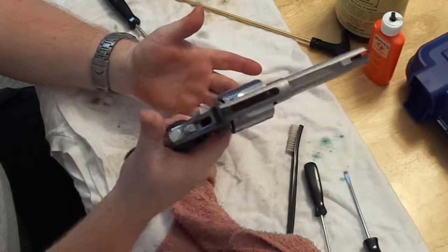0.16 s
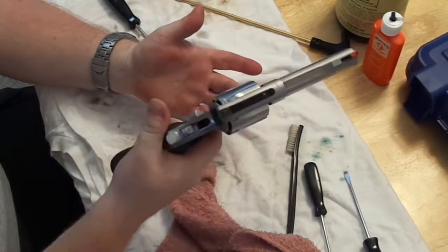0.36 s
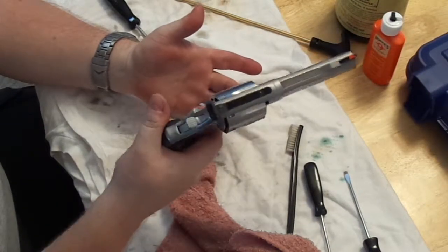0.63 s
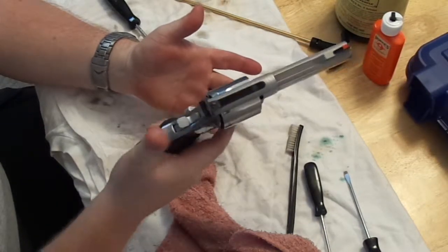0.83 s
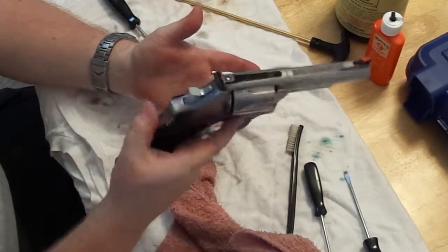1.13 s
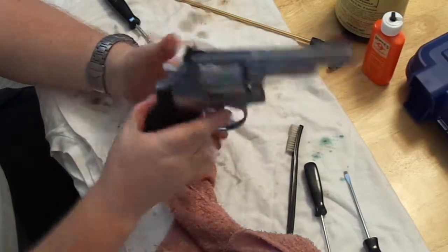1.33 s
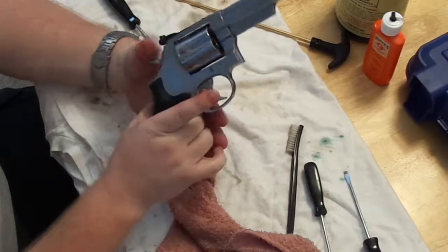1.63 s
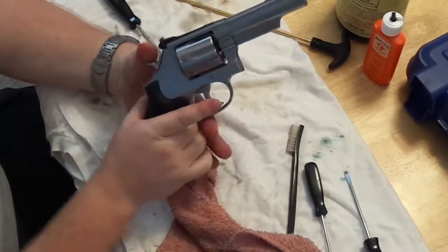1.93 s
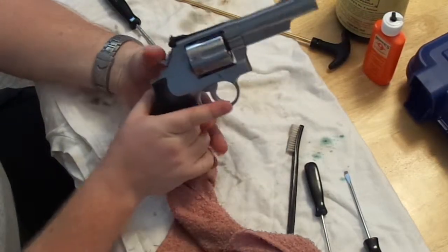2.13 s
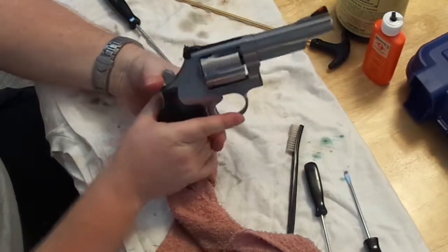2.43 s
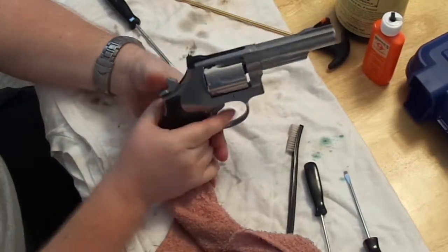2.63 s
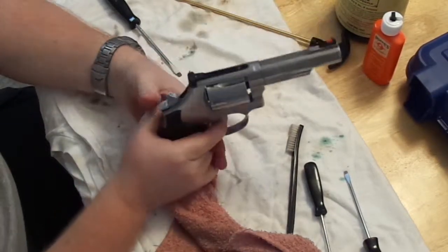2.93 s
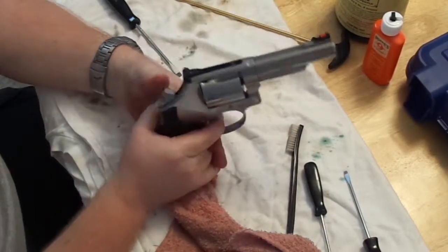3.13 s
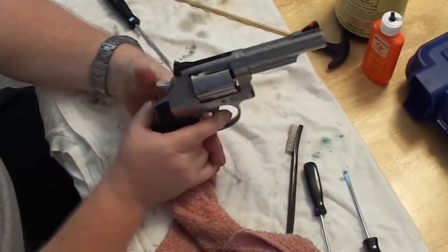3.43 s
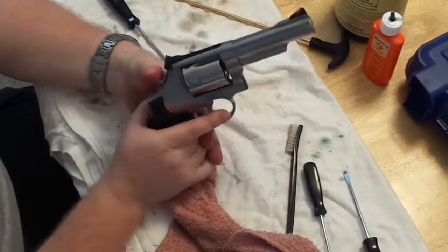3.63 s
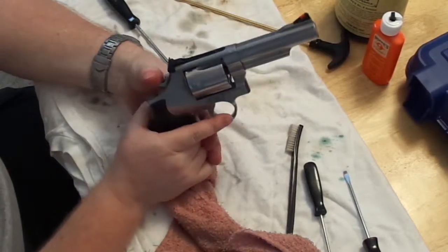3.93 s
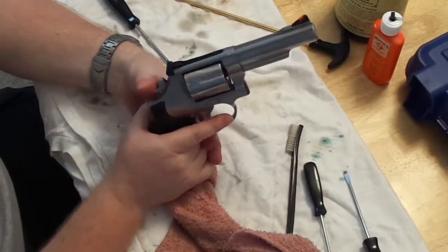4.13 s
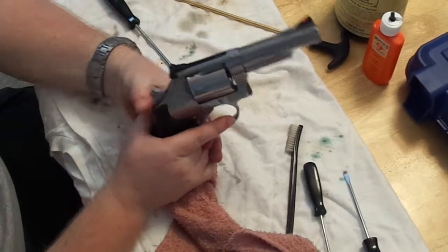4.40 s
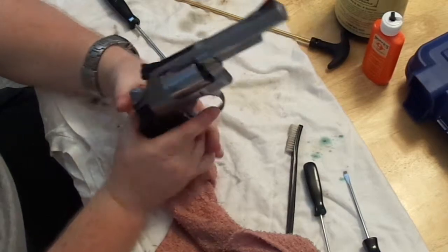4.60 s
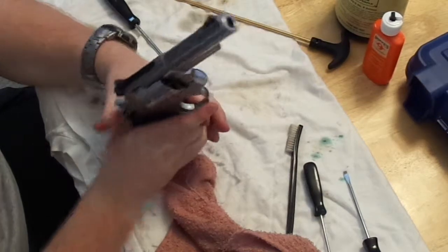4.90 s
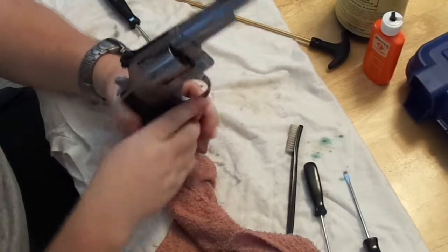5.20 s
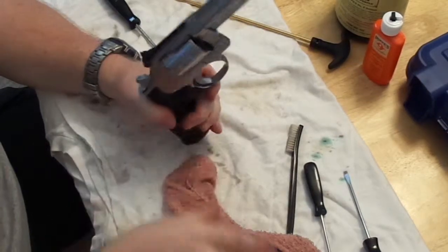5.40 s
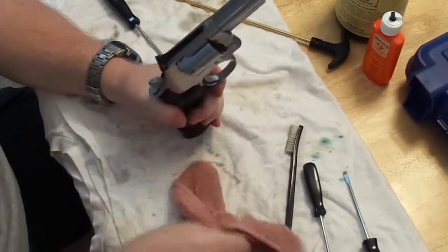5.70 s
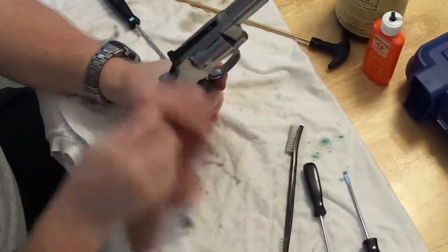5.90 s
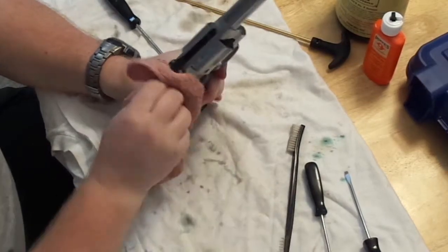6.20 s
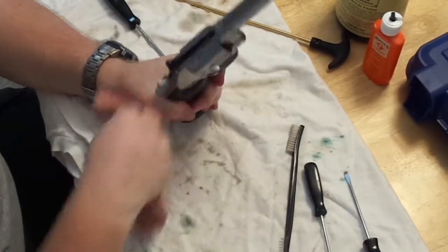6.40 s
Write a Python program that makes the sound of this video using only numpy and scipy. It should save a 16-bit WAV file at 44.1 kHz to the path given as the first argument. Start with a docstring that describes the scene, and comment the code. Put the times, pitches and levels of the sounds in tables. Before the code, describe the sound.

Close handling of a steel revolver over a cloth-covered table in a small room. A bright, overloading hammer snap comes early, then a sharp trigger-return click and a rapid ratcheting cock. A second equally violent snap follows, with another reset and cocking. Finally come faint squeaks, soft cloth bumps and light cylinder ticks. A quiet steady appliance hum and rush lies beneath; nearly mono, with short room reflections.

```python
"""A steel revolver's hammer falls twice with a snap that overloads the microphone, over a table in a small room.
After each fall the trigger resets and the hammer is cocked again; late on, a cloth is brought to the gun and
its cylinder ticks. Contacts are short noise bursts that excite decaying steel modes, then coloured and echoed.
Below them lie dull bumps, faint narrow-band squeaks and an appliance: filtered noise, steady tones, motor drone."""
import sys
import numpy as np
from scipy import signal
from scipy.fft import rfft, irfft, next_fast_len
from scipy.io import wavfile
from scipy.ndimage import minimum_filter1d, map_coordinates

SR = 44100
rng = np.random.default_rng(int(sys.argv[2]) if len(sys.argv) > 2 else 0)


def to_wav(s):
    """Save 16-bit WAV."""
    ch = np.atleast_2d(s).T  # columns
    pcm = np.round(np.clip(ch, -1, 1) * 32767)  # PCM
    wavfile.write(sys.argv[1], SR, pcm.astype(np.int16))


N = 288842


def amp(db):
    """Amplitude ratio of a level in dB."""
    return 10 ** (np.asarray(db) / 20)


def unit(x):
    """x scaled to RMS 1."""
    return x / np.sqrt(np.mean(x ** 2) + 1e-20)


def scaled_to(x, reference, db=0):
    """x given the energy of the reference, offset by db."""
    return amp(db) * np.linalg.norm(reference) * x / np.linalg.norm(x)


def along(points, hz):
    """Interpolate (frequency [Hz], value) points on a log frequency axis."""
    point_hz, value = np.transpose(points)
    return np.interp(np.log(hz + 1), np.log(point_hz + 1), value)


def fade(t, t60_s):
    """Exponential decay by 60 dB in t60_s."""
    return np.exp(-np.log(1000) * t / t60_s)


def wobble(rate_hz):
    """Smooth random curve with rate_hz knots per second."""
    knots = rng.standard_normal(int(N * rate_hz / SR) + 4)
    return map_coordinates(knots, [np.arange(N) * rate_hz / SR])


def bell(hz, centre_hz, octaves):
    """Resonance weight: 1 at the centre, falling on both sides."""
    return 1 / (1 + (np.log2((hz + 1) / centre_hz) / octaves) ** 2)


def treble(hz, corner_hz=5800):
    """Weight going from 0 in a click's body to 1 in its treble."""
    return 1 - 1 / (1 + (hz / corner_hz) ** 6)


def ripple(hz, ripple_db, spacing_hz=280):
    """Random peaks and gaps in the gun's radiation, new at each blow."""
    knots = rng.standard_normal(400)
    return ripple_db * map_coordinates(knots, [hz / spacing_hz], mode="mirror")


def coloured(x, gain_db):
    """x through the causal minimum-phase filter with gain gain_db(hz)."""
    size = 2 * next_fast_len(x.shape[-1])
    cepstrum = irfft(np.log(amp(gain_db(np.fft.rfftfreq(size, 1 / SR)))), size)
    cepstrum[1:size // 2] *= 2  # fold onto positive time
    cepstrum[size // 2 + 1:] = 0
    response = np.exp(rfft(cepstrum))
    return irfft(rfft(x, size) * response, size)[..., :x.shape[-1]]


def add(track, start_s, sound):
    """Mix a sound into the track at start_s."""
    part = track[max(round(start_s * SR), 0):][:len(sound)]
    part += sound[:len(part)]


# decay of the room's diffuse tail: (frequency [Hz], t60 [s])
ROOM_DECAY = [(200, 0.49), (800, 0.24), (2500, .28), (5500, 0.3), (9000, 0.2), (15000, .2)]


def in_room(x, wet_db, table_db, table_delay_s=0.0053, build_s=0.0034):
    """Direct sound, its bounce off the table and the walls' diffuse answer."""
    hz, frame_s, z = signal.stft(rng.standard_normal(len(x)), SR, nperseg=256)
    decay = fade(frame_s, along(ROOM_DECAY, hz)[:, None])
    tail = signal.istft(z * decay, SR, nperseg=256)[1][:len(x)]
    tail *= 1 - np.exp(-np.arange(len(tail)) / SR / build_s)
    paths = amp(wet_db) * tail / np.linalg.norm(tail)
    paths[0] += 1
    paths[round(table_delay_s * SR)] += amp(table_db)
    return signal.fftconvolve(x, paths)


def contact(t60_s, rise_s):
    """One brief chatter of touching parts, nearly flat in spectrum, in a half-second buffer."""
    t = np.arange(SR // 2) / SR
    shape = fade(t, t60_s) * (1 - np.exp(-t / rise_s))
    shape /= shape.max()
    noise = rng.standard_normal(len(t)) * shape
    flat = np.exp(1j * np.angle(rfft(noise)))  # phase only
    burst = irfft(flat, len(t)) * np.sqrt(shape)
    return scaled_to(burst, shape)


# modes of steel frame and cylinder: (frequency [Hz], relative level [dB], t60 [s])
STEEL_MODES = [(1762, -4, 0.32), (1940, -4.5, .25), (2433, -6, .27), (2705, -6, .22), (2831, -5, 0.24),
               (3470, -4, .22), (3801, -6.5, .25), (4060, -6.5, .22), (4350, -5.5, 0.27), (7440, -4, 0.12),
               (9160, -4.5, 0.2), (9300, -4.5, 0.45), (12240, -2, 0.12)]


def ring(blow, ring_db, pitch_hz, near_db, near_octaves=0.36):
    """A blow excites the steel's modes at random strengths, favouring those near the struck part's pitch."""
    t = np.arange(len(blow)) / SR
    modes = np.zeros(len(t))
    for hz, db, t60_s in STEEL_MODES:
        strength, phase = rng.standard_normal(2)
        mode_db = db + 1.5 * strength + near_db * bell(hz, pitch_hz, near_octaves)
        modes += amp(mode_db) * fade(t, t60_s) * np.sin(2 * np.pi * hz * t + np.pi * phase)
    return scaled_to(modes, blow, ring_db)


def shimmer(blow, shimmer_db, t60_s):
    """Decaying noise stands for the countless close modes of springs and plates."""
    t = np.arange(len(blow)) / SR
    dense = rng.standard_normal(len(t)) * fade(t, t60_s)
    return scaled_to(dense, blow, shimmer_db)


# colour of the lockwork's clicks: (frequency [Hz], gain [dB])
CLICK_COLOUR = [(100, -35.5), (300, -28.5), (750, -20), (1100, -14), (1450, -12.5), (1950, -5),
                (2700, -3.5), (3200, -9.5), (4280, -2.3), (5200, -13), (7300, -7.5), (9500, -10.5),
                (12300, -7.5), (15000, -7.5)]


def click(db, bright_db, t60_s, pitch_hz, part_db, ring_db, force_db=0, tone_db=0, part_octaves=0.19):
    """A small steel part drops into place and rings the frame; the hand's drive shifts level and tone."""
    blow = contact(t60_s, rise_s=0.00035)
    steel = blow + ring(blow, ring_db, pitch_hz, near_db=2.0)

    def colour_db(hz):
        part = part_db * bell(hz, pitch_hz, part_octaves)
        tilt = (bright_db + tone_db) * treble(hz)
        return along(CLICK_COLOUR, hz) + part + tilt + ripple(hz, ripple_db=2.5)

    sound = in_room(coloured(steel, colour_db), wet_db=-5.0, table_db=-9.5, table_delay_s=0.0052)
    return amp(db + force_db) * sound


# colour of the cylinder's ticks: (frequency [Hz], gain [dB])
TICK_COLOUR = [(500, -21), (1700, -15), (2400, -8.5), (3600, -1.5), (4500, -5), (5600, -15.5), (8000, -14),
               (11000, -30), (15000, -28)]


def cylinder(db, ring_db, ring_hz, ring_t60_s):
    """The cylinder knocks against its stop and sings on one decaying note."""
    blow = contact(t60_s=0.011, rise_s=0.00027)
    t = np.arange(len(blow)) / SR
    note = fade(t, ring_t60_s) * np.sin(2 * np.pi * ring_hz * t)
    note = scaled_to(note, blow, ring_db)
    knock = in_room(blow, wet_db=-6, table_db=-7, table_delay_s=0.0057)[:len(t)]
    return amp(db) * coloured(knock + note, lambda hz: along(TICK_COLOUR, hz))


# appliance tones: (frequency [Hz], relative level [dB])
HUM_TONES = [(444.3, 0.5), (489, -9.5), (609, -8.5), (818.3, -13), (1093, -13.5)]
# colour of the appliance's rush: (frequency [Hz], gain [dB])
RUSH_COLOUR = [(20, -22), (45, -23.5), (90, -20), (220, -13.5), (400, -13.5), (700, -12), (1100, -15),
               (1700, -16.5), (1815, -15), (1950, -20), (6000, -26.5), (15000, -27.5)]
RUSH_DB = -58
HUM_START_DB, HUM_RISE_DB_PER_S = -69, 0.81


def background():
    """An appliance: filtered-noise rush, slowly growing tones and a faint motor drone."""
    t = np.arange(N) / SR
    rush = unit(coloured(rng.standard_normal(N), lambda hz: along(RUSH_COLOUR, hz)))
    tones = np.zeros(N)
    for hz, db in HUM_TONES:
        level = amp(db + 0.89 * wobble(4.5))
        tones += level * np.sin(2 * np.pi * hz * t + 0.5 * wobble(5.3))
    hum = amp(HUM_START_DB + HUM_RISE_DB_PER_S * t) * np.sqrt(2) * tones
    motor = amp(-75.0 + wobble(2.8)) * np.sin(2 * np.pi * 59 * t)
    return amp(RUSH_DB) * rush + hum + motor


# faint high squeaks: (time [s], length [s], level before gain_db [dB], pitch [Hz])
SQUEAK_EVENTS = [(5.095, 0.044, -62.5, 3090), (5.275, 0.046, -60.5, 2730), (5.751, 0.067, -64, 2630),
                 (6.083, 0.054, -61, 2690)]


def squeaks(gain_db=-4, octaves=0.09):
    """Each squeak is a narrow, unsteady noise band that swells and fades."""
    track = np.zeros(N)
    t = np.arange(SR // 2) / SR
    for start_s, length_s, db, pitch_hz in SQUEAK_EVENTS:
        noise = rng.standard_normal(len(t))
        band = unit(coloured(noise, lambda hz: 20 * np.log10(bell(hz, pitch_hz, octaves))))
        swell = np.sqrt(np.abs(np.sin(np.pi * np.minimum(t / length_s, 1))))
        add(track, start_s, amp(db + gain_db) * in_room(band * swell, wet_db=-2.5, table_db=-17))
    return track


# hands and cloth on the grip: (time [s], level [dB], pitch [Hz], t60 [s])
BUMP_EVENTS = [(0.0185, -38.5, 1460, 0.015), (0.02, -52, 440, 0.044), (5.797, -52.5, 1140, 0.11),
               (6.279, -56, 494, 0.067), (6.365, -50.5, 686, 0.11), (6.402, -50.5, 895, 0.11),
               (6.506, -52.5, 790, 0.053)]


def bumps():
    """Soft contacts sound in one broad, damped band."""
    track = np.zeros(N)
    for start_s, db, pitch_hz, t60_s in BUMP_EVENTS:
        blow = contact(t60_s, rise_s=0.00058)
        bump = coloured(blow, lambda hz: -20 * np.log10(1 + (2.4 * np.log2((hz + 1) / pitch_hz)) ** 2))
        add(track, start_s, amp(db) * in_room(scaled_to(bump, blow), wet_db=-5.5, table_db=-10))
    return track


# loose parts tick as the grip shifts: (time [s], level [dB], treble tilt [dB])
RATTLE_EVENTS = [(1.714, -55.5, 14), (2.214, -39.5, -6), (4.0366, -40.5, -19), (5.796, -41, -1),
                 (6.0152, -49, 10.5)]
# cylinder ticks in its play: (time [s], level [dB], ring level re blow [dB], ring pitch [Hz])
TICK_EVENTS = [(6.276, -18, -22, 4170), (6.364, -21.5, -15, 3580)]
RATTLE = dict(t60_s=0.018, pitch_hz=2700, part_db=6, ring_db=-23)
TICK_T60_S = 0.084  # ring damped by the hand


def loose_parts():
    """Small parts and the cylinder move in their play as the gun is turned."""
    track = np.zeros(N)
    for start_s, db, bright_db in RATTLE_EVENTS:
        add(track, start_s, click(db, bright_db, **RATTLE))
    for start_s, db, ring_db, ring_hz in TICK_EVENTS:
        add(track, start_s, cylinder(db, ring_db, ring_hz, TICK_T60_S))
    return track


# thumb draws the hammer back: (time [s], stroke [s], drive [dB], treble tilt [dB])
COCKING_EVENTS = [(2.3255, .0419, -1.5, 0), (4.2387, .0349, 1.96, -2)]
# thumb lets go, hammer settles on the sear: (time [s], drive [dB])
RELEASE_EVENTS = [(2.527, .5), (4.4558, 1)]
LOCK_SHARE = 0.59  # fraction of the stroke at which the cylinder locks
STOP_RISE = dict(db=-19, bright_db=9.5, t60_s=0.015, pitch_hz=3500, part_db=9, ring_db=-23)
STOP_LOCK = dict(db=-3.5, bright_db=-3, t60_s=0.0076, pitch_hz=3790, part_db=7.5, ring_db=-21)
FULL_COCK = dict(db=-5.5, bright_db=-1, t60_s=0.022, pitch_hz=2500, part_db=-0.5, ring_db=-17)
SEAR_SETTLE = dict(db=-29.5, bright_db=-12, t60_s=0.017, pitch_hz=2000, part_db=1, ring_db=-22)
CYLINDER_DB, CYLINDER_LAG_S = -13.5, 0.001284  # knock just after full cock
CYLINDER_RING = dict(ring_db=-5, ring_hz=4520, ring_t60_s=0.26)


def cocking():
    """The stop rises and locks the cylinder; the hammer reaches full cock, then settles on the sear."""
    track = np.zeros(N)
    for start_s, stroke_s, db, bright_db in COCKING_EVENTS:
        drive = dict(force_db=db, tone_db=bright_db)
        full_s = start_s + stroke_s
        add(track, start_s, click(**STOP_RISE, tone_db=bright_db))  # level set by its own spring
        add(track, start_s + LOCK_SHARE * stroke_s, click(**STOP_LOCK, **drive))
        add(track, full_s, click(**FULL_COCK, **drive))
        add(track, full_s + CYLINDER_LAG_S, cylinder(db + CYLINDER_DB, **CYLINDER_RING))
    for start_s, db in RELEASE_EVENTS:
        add(track, start_s, click(**SEAR_SETTLE, force_db=db))
    return track


# trigger springs forward: (time [s], travel [s], drive [dB], treble tilt [dB], frame knock pitch [Hz])
RETURN_EVENTS = [(0.6992, .0157, -2.5, 3, 3640), (3.3652, 0.018, 1.5, 1, 1090)]
SEAR_RESET = dict(db=-20.5, bright_db=1, t60_s=0.025, pitch_hz=2530, part_db=8, ring_db=-25)
TRIGGER_HOME = dict(db=-4, bright_db=4, t60_s=0.01, pitch_hz=2190, part_db=3, ring_db=-25)
FRAME_KNOCK = dict(db=-10.5, bright_db=-17, t60_s=0.045, part_db=6.5, ring_db=-22)  # dull answer


def trigger():
    """On its way forward the trigger resets the sear, then slaps home on the frame."""
    track = np.zeros(N)
    for start_s, travel_s, db, bright_db, knock_hz in RETURN_EVENTS:
        drive = dict(force_db=db, tone_db=bright_db)
        add(track, start_s, click(**SEAR_RESET, **drive))
        slap = click(**TRIGGER_HOME, **drive)
        knock = click(**FRAME_KNOCK, **drive, pitch_hz=knock_hz)
        add(track, start_s + travel_s, slap + knock)
    return track


# hammer falls on the frame: (time [s], level [dB], loss per rebound [dB])
HAMMER_FALLS = [(0.5015, 11, 8), (3.1785, 11.5, 9.5)]
# colour of the snap: (frequency [Hz], gain [dB])
SNAP_COLOUR = [(150, -40.5), (600, -24.5), (1400, -21), (1720, -11.5), (2050, -18.5), (2450, -11),
               (3100, -14.5), (4400, -10.5), (5000, -11.5), (6200, -9), (7500, -4), (9300, 1.5),
               (11000, -1.7), (14500, -2.5)]
REBOUND_S, REBOUND_BRIGHT_DB = 0.0045, 1  # spacing of contacts, added treble at each


def hammer(contacts=3):
    """The mainspring drives the hammer onto the frame: a very loud, bright snap with quick rebounds."""
    track = np.zeros(N)
    for start_s, db, loss_db in HAMMER_FALLS:
        for k in range(contacts):
            blow = contact(t60_s=0.017, rise_s=0.0001)
            modes = ring(blow, ring_db=-21, pitch_hz=1904, near_db=3.5)
            steel = blow + modes + shimmer(blow, shimmer_db=-13, t60_s=0.5)

            def colour_db(hz):
                tilt = k * REBOUND_BRIGHT_DB * treble(hz)
                return along(SNAP_COLOUR, hz) + tilt + ripple(hz, ripple_db=0.5)

            snap = in_room(coloured(steel, colour_db), wet_db=-10.5, table_db=-11.5)
            add(track, start_s + k * REBOUND_S, amp(db - k * loss_db) * snap)
    return track


def scene(side_db=-31):
    """Nearly mono sum; the two channels differ only by a very faint, smeared copy of the sound."""
    sound = background() + squeaks() + bumps() + loose_parts() + cocking() + trigger() + hammer()
    smear = contact(t60_s=0.03, rise_s=0.0003)
    smear /= np.linalg.norm(smear)
    side = amp(side_db) * signal.fftconvolve(sound, smear)[:N]
    return np.array([sound + side, sound - side])


def record(dry, top=0.84, overload=1.35, hold_s=0.03, thump_db=19.0, thump_low_hz=120, thump_high_hz=750,
           top_hz=15150):
    """An overload's first peaks jolt the microphone into a low thump; peaks clip and the band is limited."""
    excess = np.tanh(8 * np.maximum(np.abs(dry) - overload, 0))
    size = 2 * int(hold_s * SR / 2) + 1
    held = -minimum_filter1d(-excess, size, origin=size // 2)  # stays saturated for hold_s
    jolt = np.maximum(np.diff(held, prepend=0), 0)
    thump = signal.lfilter(*signal.butter(2, thump_low_hz, "highpass", fs=SR), jolt)
    thump = signal.lfilter(*signal.butter(1, thump_high_hz, fs=SR), thump)
    clipped = np.clip(dry, -top, top) + amp(thump_db) * thump
    band = signal.firwin(301, top_hz, fs=SR)
    return signal.fftconvolve(clipped, band[None], "same", axes=1)


dry = scene()
out = record(dry)
to_wav(out)
```